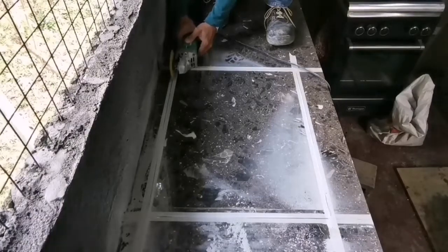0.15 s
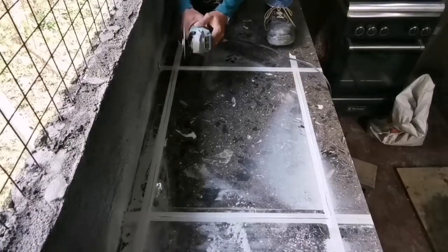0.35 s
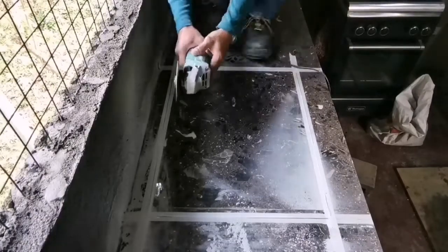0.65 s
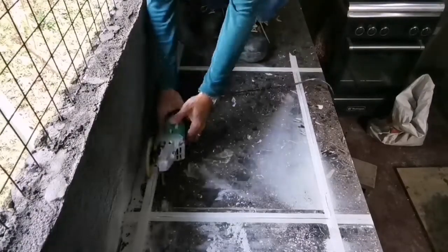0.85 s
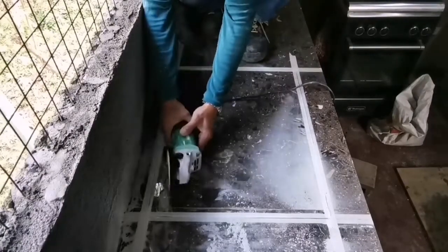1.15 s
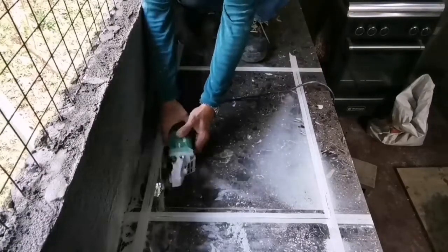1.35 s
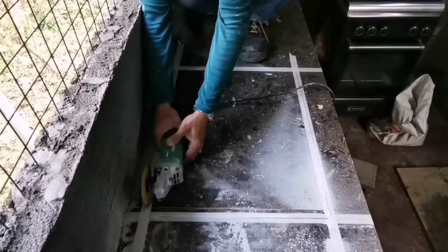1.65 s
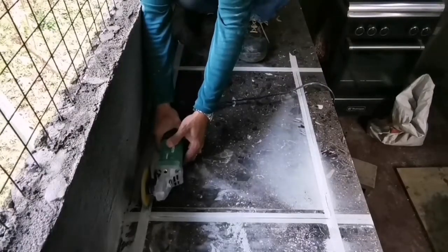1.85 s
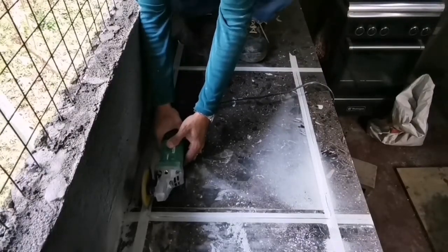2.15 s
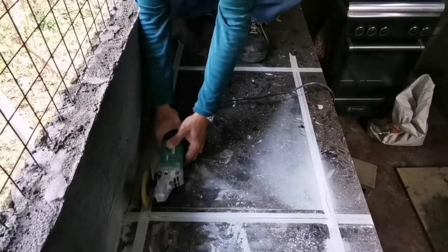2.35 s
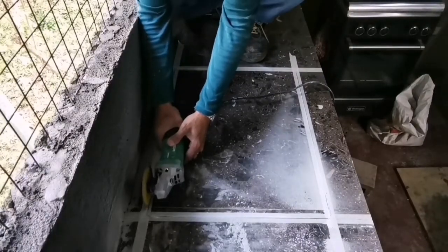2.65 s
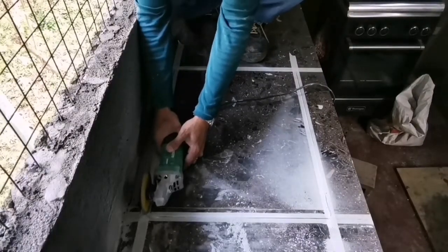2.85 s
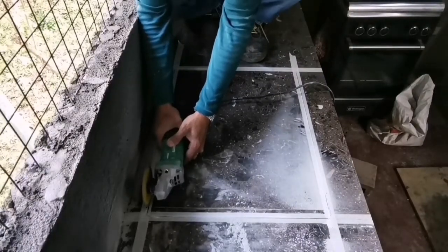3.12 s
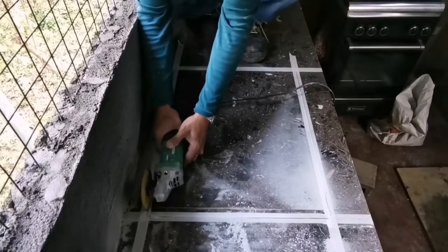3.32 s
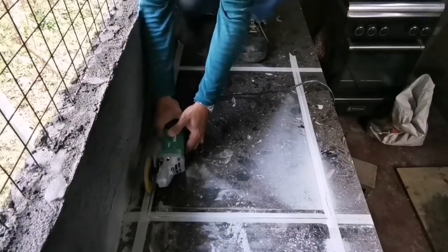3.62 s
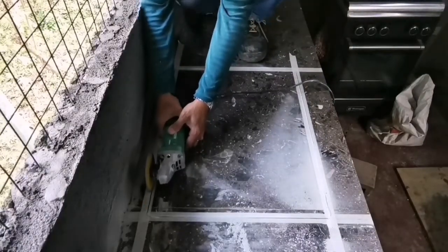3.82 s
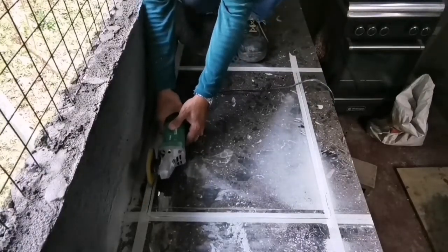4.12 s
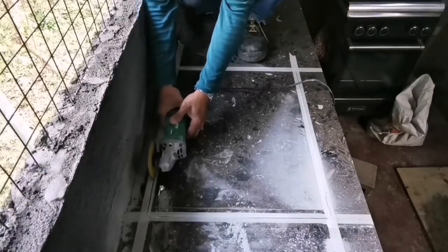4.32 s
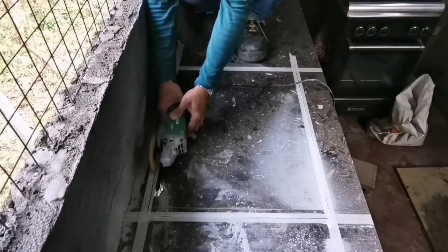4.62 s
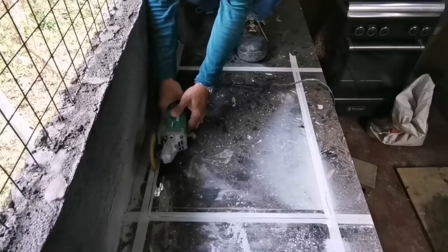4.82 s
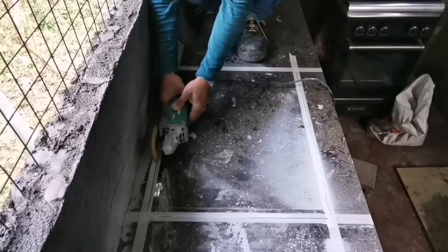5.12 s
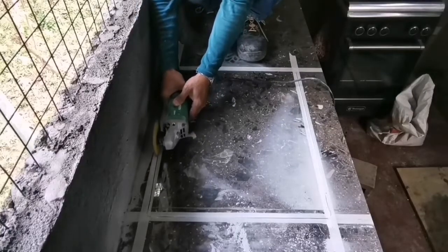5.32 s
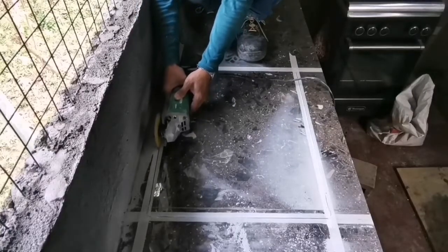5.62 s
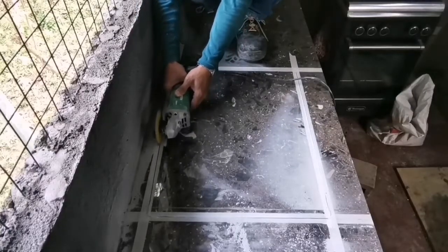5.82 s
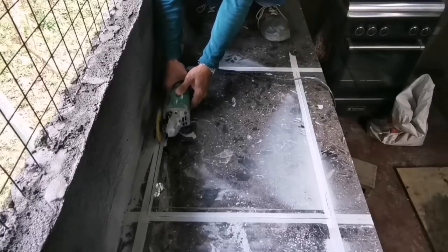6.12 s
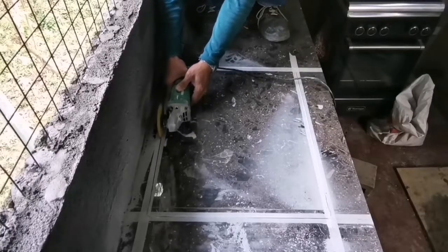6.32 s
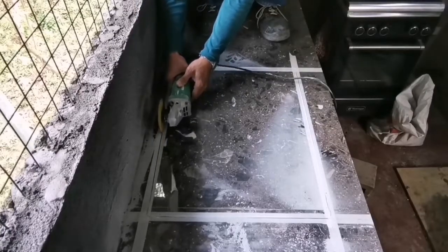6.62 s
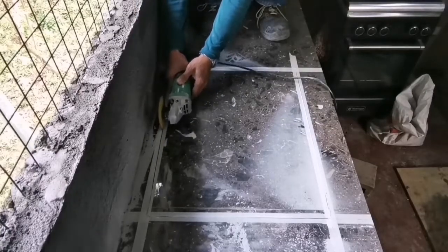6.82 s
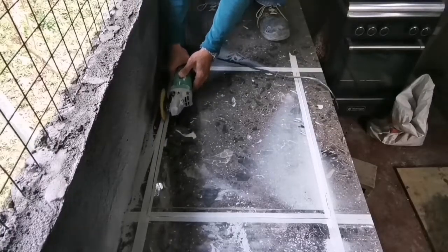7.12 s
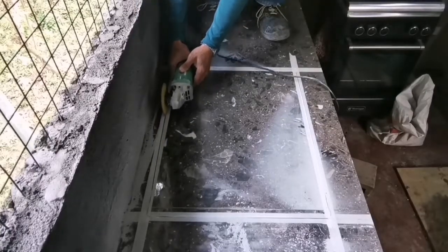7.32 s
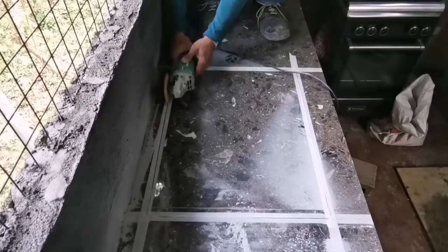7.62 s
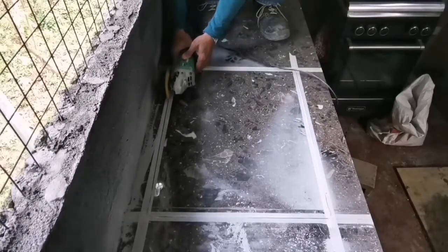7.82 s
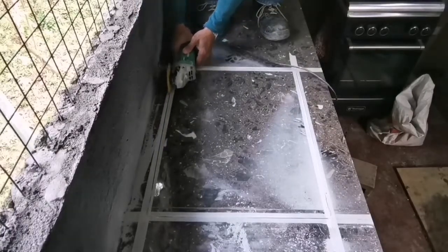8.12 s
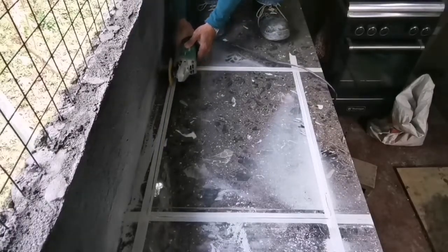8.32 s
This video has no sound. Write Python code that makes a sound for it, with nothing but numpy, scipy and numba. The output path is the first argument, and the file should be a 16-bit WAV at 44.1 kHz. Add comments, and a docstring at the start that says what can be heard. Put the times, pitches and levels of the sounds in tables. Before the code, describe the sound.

In a small hard room, an angle grinder runs continuously, heard close in stereo. From 0 to 0.3 s the disc skims tile: dense, bright metallic ringing from about 2.6 kHz upward, with gritty hiss and little low end. At 0.3 s it lifts and spins free; a hollow rush of air around 600-1100 Hz joins a faintly buzzing fan and gear whirr, gusting, while the housing rattle builds. At about 1.9 s it lands; strong bites come at 2.05, 2.4, 2.6 and 2.9 s, with a slip near 3.25 s. From 3.6 s pressure jumps: rough low rumble and dull chip knocks sit under the harsh ring and hiss, strongest until about 4.6 s. Knocks scatter until 5.7 s. Cutting continues in uneven bites, more lightly after 6 s, dipping clearly at 7.55 s and briefly at 7.95 s, then weakening at the very end, 8.4 s.

```python
"""Angle grinder on a tiled countertop

An angle grinder cuts a groove along a tiled countertop in a small workspace.
Grit strikes the disc and sets it ringing over a gritty noise hiss; coarse knocks rumble in the slab.
Early on the disc is lifted and spins free with a rush of air, then lands at the near end and is drawn back.
One force curve drives ring, hiss and rumble; chips and spectral flares are short filtered bursts of noise."""
import sys
import numpy as np
from scipy import signal
from scipy.fft import rfft, irfft, next_fast_len
from scipy.io import wavfile
from numba import njit

SR = 44100
rng = np.random.default_rng(int(sys.argv[2]) if len(sys.argv) > 2 else 0)


def store_pcm(level_fs):
    """Save levels as 16-bit WAV."""
    pcm = np.round(np.clip(level_fs, -1, 1) * 32767).astype(np.int16)
    wavfile.write(sys.argv[1], SR, np.atleast_2d(pcm).T)


N = 373086
TIME = np.arange(N) / SR
LIFT_S, LAND_S = 0.331, 1.874


# place of the tool along the groove: t/s, place (0 near end - 1 far end)
PLACE = [(0, 1), (.33, 0.78), (1.86, 0.039), (3.2, 0.05), (4.0, 0.25), (4.8, 0.35), (5.6, 0.556),
         (6.6, 0.54), (8.46, 1.0)]
# depth of the rim in the groove: t/s, depth (0 skimming - 1 buried)
DEPTH = [(0, 0.047), (1.9, 0.18), (3.3, 0.33), (4.1, 0.76), (5.0, 0.98), (6.6, 1), (7.6, 0.55),
         (8.46, 0.03)]


def cutting(flutter=0.093):
    """The rim grinds the tile: one force drives ringing steel, hissing grit and knocks in the slab."""
    place, = in_time(PLACE)
    depth, = in_time(DEPTH)
    force_db = rim_force_db()
    ring = disc_ring(force_db, place, depth)
    hiss = grit_hiss(force_db, place, depth)
    rumble = slab_rumble(force_db, place, depth)
    return fluttering(ring, flutter) + microphones(hiss + rumble + chips() + flares(), LEAN)


# how hard the hand presses the disc into the tile, as force on the rim: t/s, level/dB
PRESSURE = [(0, -9), (.31, -17.5), (1.9, -11), (2.1, -6), (2.7, -4.5), (3.05, -7), (3.35, -9), (3.65, 5.3),
            (4.15, 6.2), (4.7, 2), (5.5, 1.5), (6.2, -3), (6.9, -1), (7.7, -3.5), (8.28, -0.5),
            (8.46, -15.5)]
# the rim digs in for a moment: t/s at the middle, length/s, added force/dB
BITES = [(2.05, 0.089, 8.5), (2.38, 0.068, 8.5), (2.57, 0.17, 10), (2.6, .06, 1.5), (2.92, 0.22, 11.5),
         (3.47, 0.05, 4), (3.69, 0.063, 2), (3.86, 0.1, 2), (4.08, 0.07, 3.5), (4.22, 0.08, 1),
         (4.52, 0.072, 5), (4.63, 0.059, 5.5), (4.81, 0.066, 4), (4.92, .07, 5.5), (5.04, 0.14, 4),
         (5.23, 0.11, 4.5), (5.36, 0.066, 2.5), (5.48, 0.054, 1), (5.69, 0.084, 3.5), (5.85, 0.076, 5.5),
         (6.06, 0.072, 4.5), (6.28, 0.071, 3.5), (6.43, 0.086, 7), (6.58, .07, 6), (6.76, 0.11, 6),
         (6.97, 0.055, 5.5), (7.14, 0.11, 4.5), (7.44, 0.055, 3), (7.75, 0.063, 1.5), (7.87, 0.041, 4),
         (8.22, 0.063, 2.5)]
# the rim all but leaves the tile: t/s at the middle, length/s, lost force/dB
SLIPS = [(.325, 0.055, 12), (1.93, 0.063, 5), (2.73, 0.12, 2), (3.25, 0.069, 10), (4.73, 0.072, 7),
         (5.57, 0.061, 4), (7.55, 0.14, 15), (7.95, 0.085, 9)]


def rim_force_db(chatter_db=1.5, chatter_hz=24):
    """Hand pressure plus bites, minus slips; the hand-held disc also bites unevenly."""
    pressure_db, = in_time(PRESSURE)
    return pressure_db + swells(BITES) - swells(SLIPS) + chatter_db * drift(chatter_hz)


# modes of the disc, after a first row for the guard's hollow tone;
# they shift as the groove grips the disc and radiate each in its own direction:
# f/Hz at the near end, middle and far end, width/Hz of a skimming rim,
# relative level/dB at the near end, middle and far end, left minus right level/dB, left lead/rad
DISC = [(964, 870, 810, 170, -13, -21, -11.5, 2.5, 0), (2610, 2710, 2680, 125, -5.5, -3.3, -1, -4, -0.43),
        (2914, 2970, 2985, 100, -5, -5, -2, -7, 1.57), (3624, 3660, 3680, 53, -2.5, -5.5, -7.5, -3.5, -2.2),
        (4730, 4690, 4730, 36, 1.5, -5, -7, -3, -0.5), (6220, 6170, 6180, 99, -6.5, -10, -12, 2, 0.3),
        (7590, 7650, 7650, 100, -5.5, -2.5, 2.5, -2.5, 1.6), (8000, 8130, 8080, 83, -1, -5, -11, 3, 1.2),
        (8740, 8700, 8720, 65, -4.5, -2, -3.5, 7, 1.2), (8970, 9060, 9080, 93, -7.5, -4, -5, 5, -1),
        (9990, 9950, 10000, 81, 2.5, -2, -5, -3.5, 2), (10270, 10430, 10440, 110, -10.5, -7.5, -3, 6, -0.1),
        (10820, 10780, 10800, 160, -9.5, -10, -10, 3, -1),
        (11690, 11610, 11660, 135, -3, -4, -3.5, -1.5, 0.2),
        (12300, 12050, 12100, 120, -14, -6, -6, -5, 0.5),
        (13700, 13740, 13700, 170, -12.5, -10, -12, 1.5, 1),
        (14600, 14300, 14340, 220, -13, -15.5, -16, 1, 1)]
# ringing steel: level/dB, change with force/(dB per dB), change at the far end/dB
RING_LAW = (-30, 0.17, -1.1)


def disc_ring(force_db, place, depth, flicker_db=1.68, waver_db=0.57, diffuse=0.66,
              wander_hz=22, damping_hz=44, clamp_db=4.5, clamp_hz=6000):
    """Grit keeps disc and guard ringing; each tone swells and bends at random and blurs with depth."""
    strikes = grit(per_s=20000, size_db=1.0)
    sides = np.array([[.5], [-.5]])  # left, right
    heard = strikes[0] + 2 * sides * diffuse * strikes[1]
    shared_wander = drift(5.4)
    tones = 0
    for k, row in enumerate(DISC):
        near_hz, middle_hz, far_hz, width, near_db, middle_db, far_db, pan_db, lead = row
        # the groove's walls hold the low tones most
        clamped_db = clamp_db * depth / (1 + (near_hz / clamp_hz) ** 2)
        tone_db = along(place, near_db, middle_db, far_db) - clamped_db + flicker_db * drift(15.6)
        gain = (-1) ** k * from_db(tone_db)  # neighbouring tones have opposite sign
        direction = from_db(pan_db * sides) * np.exp(1j * lead * sides)
        wander = (shared_wander + drift(11.0)) / 2
        hz = along(place, near_hz, middle_hz, far_hz) + wander_hz * (.5 + depth) * wander
        ringing = resonate(heard, hz, width + damping_hz * depth)
        tones = tones + gain * (direction * ringing).real
    ring_db = layer_db(RING_LAW, force_db, place) + waver_db * drift(16)
    return from_db(ring_db) * rms_one(tones)


# spectrum of the fine grit: f/Hz, relative level/dB per Hz
HISS = [(300, -37), (600, -12), (800, -5.5), (1200, 0.9), (1550, -4), (1900, -1.6), (3200, 3), (4300, 1.5),
        (5100, 2), (5650, -2.5), (6300, 0), (7000, 2), (8350, -4.5), (9400, -2.5), (11200, -5),
        (12300, -1.5), (12900, -28)]
# fine grit: level/dB, change with force/(dB per dB), change at the far end/dB
HISS_LAW = (-33.5, 0.18, -.3)


def grit_hiss(force_db, place, depth, rasp_depth_db=1.0):
    """Dense tiny impacts make a patchy hiss, a little louder deep in the groove."""
    rasp = patchy(coloured(grit(per_s=28000, size_db=1.86), HISS), patchy_db=1.4, rate_hz=23)
    hiss_db = layer_db(HISS_LAW, force_db, place) + rasp_depth_db * depth
    return from_db(hiss_db) * off_the_wall(rasp, place)


# spectrum of the coarse knocks: f/Hz, relative level/dB per Hz
RUMBLE = [(20, -6), (60, -4), (180, -0.5), (380, -2.5), (600, -3.5), (1100, -8.5), (1700, -6.5),
          (3000, -11.5), (8000, -21)]
# upper part of the rumble: level/dB, change with force/(dB per dB), change at the far end/dB
RUMBLE_LAW = (-44, 0.94, 0.41)
# deep part, which carries best from the near end: same columns
THUD_LAW = (-42.5, 0.89, -1.9)


def slab_rumble(force_db, place, depth, thud_hz=400, skim_depth=0.061):
    """Coarse knocks shake the slab; a rim shallower than skim_depth moves it less."""
    knocks = coloured(grit(per_s=4000, size_db=2.0), RUMBLE)
    thud = filtered(knocks, lambda hz: 1 / (1 + (hz / thud_hz) ** 2))
    upper = from_db(layer_db(RUMBLE_LAW, force_db, place)) * (knocks - thud)
    deep = from_db(layer_db(THUD_LAW, force_db, place)) * thud
    return np.tanh(depth / skim_depth) * (upper + deep)


# chips breaking off: t/s, level/dB before the decay, top f/Hz, decay/s
CHIPS = [(3.668, -38, 450, .008), (3.952, -34, 320, .009), (4.111, -25, 1600, 0.0022),
         (4.146, -35, 380, .008), (4.17, -36, 450, 0.0064), (4.198, -33, 450, .008),
         (4.648, -34, 450, .006), (5.038, -34, 500, .006), (5.183, -25, 1600, 0.0019),
         (5.223, -29, 800, .006), (5.356, -35, 450, .005), (5.68, -29.5, 340, 0.011)]


def chips(low_hz=55):
    """A flake breaks away with a short, dull knock: band-limited noise that dies away."""
    out = np.zeros((2, N))
    age = TIME[:SR // 8]
    for s, db, top_hz, decay_s in CHIPS:
        band = signal.butter(2, [low_hz, top_hz], "band", fs=SR, output="sos")
        rattle = signal.sosfilt(band, rng.standard_normal((2, len(age))))
        fade = np.exp(-age / decay_s)
        knock = rms_one(rattle * fade) * np.sqrt(np.mean(fade ** 2))
        start = int(s * SR)
        out[:, start:start + len(age)] += from_db(db) * knock
    return out


# flares in the spectrum: t/s at the middle, length/s, f/Hz, width/Hz, level/dB
FLARES = [(2.134, .32, 3620, 50, -45), (2.184, 0.06, 4740, 50, -35), (2.68, 0.079, 8650, 50, -42),
          (3.18, .07, 4720, 50, -41), (3.656, .12, 3630, 180, -42), (3.892, 0.047, 2470, 220, -35),
          (4.0, .45, 9930, 80, -40), (4.98, 0.25, 4670, 260, -43), (6.06, 0.1, 2290, 300, -38.5),
          (6.3, .5, 9100, 130, -47), (6.402, 0.054, 2780, 350, -36), (6.44, .08, 2040, 600, -39),
          (6.908, 0.065, 7700, 60, -38), (6.957, 0.089, 2730, 220, -36), (7.108, 0.088, 2750, 220, -38),
          (7.55, .2, 4725, 60, -51), (8.22, 0.15, 7620, 110, -42)]


def flares():
    """A narrow or broad stretch of the spectrum swells for a moment: noise through one resonance."""
    out = np.zeros((2, N))
    for s, length, hz, width, db in FLARES:
        peak = signal.iirpeak(hz, hz / width, fs=SR)
        band = rms_one(signal.lfilter(*peak, rng.standard_normal((2, N))))
        out += from_db(db) * swells([(s, length, 1)]) * band
    return out


def spinning_free(flutter=.07):
    """The disc drags air through its guard while fan and gears rattle the housing."""
    place, = in_time(PLACE)
    drive = fluttering(motor_noise(place) + housing_rattle(), flutter)
    return air_rush(place) + motor_gain(place) * drive


# spectrum of the open air rush: f/Hz, relative level/dB per Hz
AIR = [(20, -15), (120, -16.5), (300, -9.5), (470, -9.5), (600, 0.5), (1100, 0.5), (1500, -4), (2500, -27),
       (6000, -18.5)]
# resonances of the guard in free air: f/Hz, width/Hz, relative level/dB
GUARD = [(597, 79, -7), (956, 82, 0), (1125, 220, -3.5)]
# the guard's hollow tone against the open rush: t/s, level/dB
GUARD_LEVEL = [(.33, 0), (.84, -4.5), (.91, 0.5), (1.25, 1), (1.86, -1.5), (5.5, -6)]
# the rush swells and sinks as the tool is carried over: t/s at the middle, length/s, change/dB
GUSTS = [(.39, .1, 2), (.8, .08, -2), (.935, .075, 2), (1.035, .08, -3.5), (1.16, .15, 1.5),
         (1.28, .07, -2)]


def air_rush(place, air_db=-39.0, far_db=-2.5):
    """Turbulent noise, partly hollowed by the guard's resonances and louder toward the near end."""
    hollow_db, = in_time(GUARD_LEVEL)
    open_air = coloured(rng.standard_normal((2, N)), AIR)
    hollow = from_db(hollow_db) * body(rng.standard_normal((2, N)), GUARD)
    gain = from_db(air_db + far_db * place + swells(GUSTS) + 1.5 * drift(35))
    return gain * (open_air + hollow)


# spectrum of the fan and gears: f/Hz, relative level/dB per Hz
MOTOR = [(300, -20.5), (1000, -11.5), (1800, -0.6), (2250, 0), (2800, 2.8), (3700, 0), (4500, -0.2),
         (5600, -6.5), (6600, -6.5), (8000, -10), (12200, -11.5), (13000, -24), (14500, -21), (15500, -30)]


def motor_noise(place):
    """Fan and gears as dense impacts, with a patchy spectrum and a gliding wall echo; rms 1."""
    whirr = coloured(grit(per_s=30000, size_db=.6), MOTOR)
    return off_the_wall(patchy(whirr, patchy_db=0.8, rate_hz=21), place)


# resonances of the housing in free air: f/Hz, width/Hz, relative level/dB
HOUSING = [(2660, 180, 3.5), (4680, 330, 1.5), (6970, 130, 1), (7210, 160, 0.5), (7550, 100, -5)]


def housing_rattle(rattle_db=-2.5, rise_db_per_s=6.5):
    """Impacts ring the housing; the rattle, set against the motor noise, builds until the landing."""
    swell_db = rattle_db + rise_db_per_s * np.minimum(TIME - LAND_S, 0)
    return from_db(swell_db + 2.0 * drift(25)) * body(grit(per_s=5000, size_db=-0.5), HOUSING)


def motor_gain(place, motor_db=-33.5, far_db=3.0, raised_db=2.0):
    """The tool is carried over in an arc whose top adds level; the far end adds level too."""
    height = np.sin(np.pi * np.clip((TIME - LIFT_S) / (LAND_S - LIFT_S), 0, 1))
    return from_db(motor_db + raised_db * height + far_db * place + 0.79 * drift(35))


def fluttering(x, amount, flutter_hz=172.3):
    """A faint fast flutter in level, heard as a buzz."""
    return x * (1 + amount * np.sin(2 * np.pi * flutter_hz * TIME))


# edges between stretches of the spectrum: f/Hz
PATCH_EDGES = [1400, 2100, 2900, 3900, 5200, 7500]


def patchy(source, patchy_db, rate_hz):
    """Each stretch below the top edge swells and fades on its own; rms 1."""
    out = 0
    for edge_hz in PATCH_EDGES:
        band = filtered(source, lambda hz: 1 / (1 + (hz / edge_hz) ** 16))
        source = source - band
        out = out + from_db(patchy_db * drift(rate_hz)) * band
    return rms_one(out + source)


def off_the_wall(x, place, near_ms=2.6, far_ms=1.9, sway_ms=.12, share=0.23):
    """The wall's echo changes delay as the tool moves, so ripples glide through the noise; rms 1."""
    delay_ms = near_ms + (far_ms - near_ms) * place + sway_ms * drift(2.5)
    late = TIME - delay_ms / 1000
    echo = np.array([np.interp(late, TIME, side, left=0) for side in x])
    return rms_one(x + share * echo)


# likeness of the two microphones: f/Hz, likeness (-1..1)
LIKENESS = [(60, 0.23), (250, 0), (600, 0.5), (1200, 0.41), (2500, 0.18), (5000, -0.12), (9000, 0.12),
            (13000, 0.06)]
# left minus right while cutting: f/Hz, level/dB
LEAN = [(100, 6), (300, 7), (600, 6), (1200, 3.5), (2500, 1), (4000, -2), (7000, -1), (8800, 9.5),
        (11000, 4.5)]
# left minus right for motor and air: f/Hz, level/dB
FREE_LEAN = [(60, -7), (150, -0.5), (380, 0.5), (950, 0.5), (2380, -0.5), (5980, -1.5), (15000, 3.5)]


def microphones(x, lean):
    """Reflections from the walls leave the two sides only partly alike."""
    mid = filtered(x[0], lambda hz: np.sqrt(1 + np.clip(at_hz(LIKENESS, hz), -1, 1)))
    side = filtered(x[1], lambda hz: np.sqrt(1 - np.clip(at_hz(LIKENESS, hz), -1, 1)))
    pair = np.array([mid + side, mid - side]) / np.sqrt(2)
    return filtered(pair, lambda hz: from_db(at_hz(lean, hz) * [[.5], [-.5]]))


def grit(per_s, size_db):
    """Random impacts of uneven size, heard along two sound paths; rms 1."""
    sizes = from_db(size_db * np.minimum(rng.exponential(1, N), 5))
    hits = rng.random(N) < per_s / SR
    return rms_one(hits * sizes * rng.standard_normal((2, N)))


def layer_db(law, force_db, place):
    """Level of a layer of the cut under the force on the rim and the place along the groove."""
    db, follows, far_db = law
    return db + follows * force_db + far_db * place


def from_db(db):
    """Decibels to gain."""
    return 10 ** (np.asarray(db) / 20)


def rms_one(x):
    """Scale to unit power."""
    return x / np.sqrt(np.mean(x ** 2) + 1e-20)


def in_time(rows):
    """Each column of a curve at every sample."""
    s, *columns = np.transpose(rows)
    return [np.interp(TIME, s, c) for c in columns]


def at_hz(points, hz):
    """Read a spectrum on a log-frequency axis."""
    at, value = np.transpose(points)
    return np.interp(np.log(hz + 1), np.log(at), value)


def along(place, near, middle, far):
    """A value that changes along the groove."""
    return np.interp(place, [0, .5, 1], [near, middle, far])


def swells(rows, shape=6.2):
    """Sum of smooth rises and falls to each row's height; shape 2 is a bell, higher has a flatter top."""
    coarse = TIME[::64]
    total = sum(height * np.exp(-np.abs(2 * (coarse - s) / length) ** shape)
                for s, length, height in rows)
    return np.interp(TIME, coarse, total)


def drift(rate_hz):
    """Slow chance with a spread of 1: noise through two equal one-pole low-passes."""
    step = 40  # drawn at every 40th sample, then interpolated
    r = np.exp(-2 * np.pi * rate_hz * step / SR)
    noise = rng.standard_normal(N // step + 2002)
    slow = signal.lfilter([1], [1, -2 * r, r * r], noise)[2000:]  # drop the filter's run-in
    return np.interp(np.arange(N) / step, np.arange(len(slow)), rms_one(slow))


def filtered(x, gain_at):
    """Apply a gain that depends on frequency."""
    size = next_fast_len(N + 4096)
    hz = np.arange(size // 2 + 1) * SR / size
    return irfft(rfft(x, size) * gain_at(hz), size)[..., :N]


def coloured(x, spectrum):
    """Give a white source its spectrum; rms 1."""
    return rms_one(filtered(x, lambda hz: from_db(at_hz(spectrum, hz))))


def body(x, modes):
    """Fixed resonances in parallel; rms 1."""
    out = 0
    for hz, width, db in modes:
        out = out + from_db(db) * signal.lfilter(*signal.iirpeak(hz, hz / width, fs=SR), x)
    return rms_one(out)


def resonate(x, hz, width):
    """A resonance of gain 1 whose centre and width may move; the complex output keeps its phase."""
    turn = np.exp(2j * np.pi * np.cumsum(hz + np.zeros(N)) / SR)
    keep = np.exp(-np.pi * np.abs(width + np.zeros(N)) / SR)
    return 2 * turn * leak(x * turn.conj(), keep)  # shift to 0 Hz, smooth, shift back


@njit
def leak(x, keep):
    """A one-pole memory whose loss may change at every sample."""
    out = np.zeros_like(x)
    for side in range(len(x)):
        for i in range(1, len(keep)):
            out[side, i] = keep[i] * out[side, i - 1] + (1 - keep[i]) * x[side, i]
    return out


def scene(lift_fade_s=0.038, land_fade_s=0.085, loaded_db=-14):
    """The cut gives way to the free spin while the disc is off the tile; under load motor and air are softer."""
    rise = np.clip(.5 + (TIME - LIFT_S) / lift_fade_s, 0, 1)
    fall = np.clip(.5 + (LAND_S - TIME) / land_fade_s, 0, 1)
    lifted = rise * fall
    running = np.maximum(np.sqrt(lifted), from_db(loaded_db))
    return np.sqrt(1 - lifted) * cutting() + running * microphones(spinning_free(), FREE_LEAN)


def record(dry):
    """The microphone's top rolls off above 14.7 kHz, then is cut at 15.7 kHz."""
    soft = signal.sosfilt(signal.butter(12, 14700, fs=SR, output="sos"), dry)
    return signal.sosfilt(signal.ellip(10, .2, 80, 15700, fs=SR, output="sos"), soft)


dry = scene()
out = record(dry)
store_pcm(out)
```